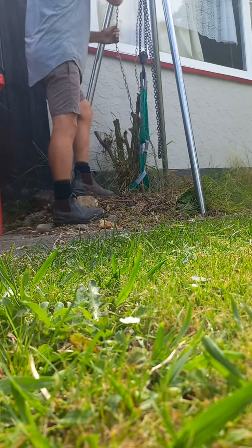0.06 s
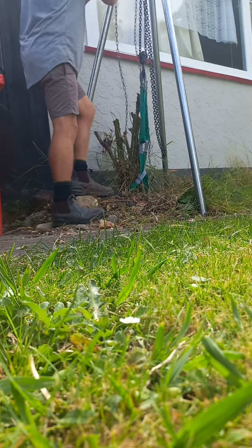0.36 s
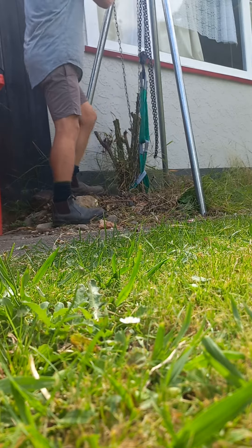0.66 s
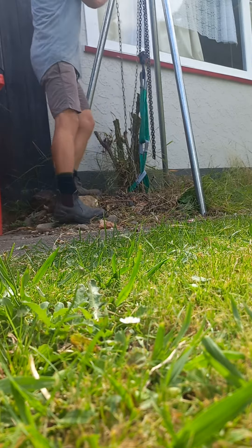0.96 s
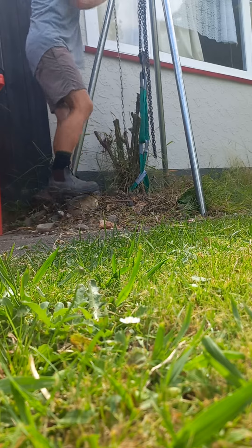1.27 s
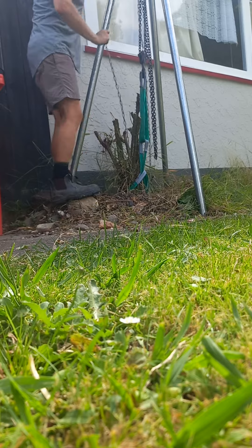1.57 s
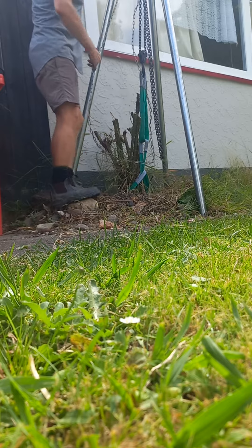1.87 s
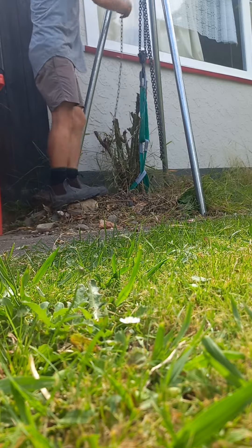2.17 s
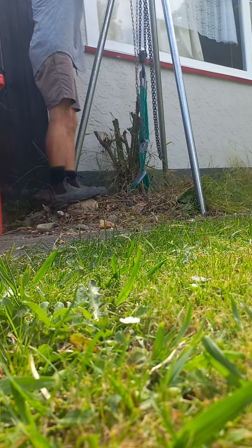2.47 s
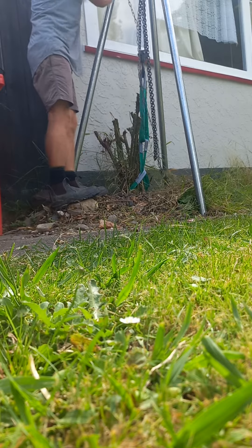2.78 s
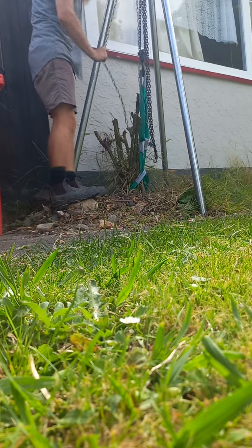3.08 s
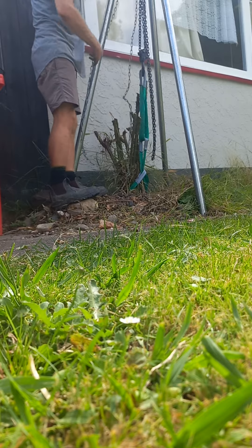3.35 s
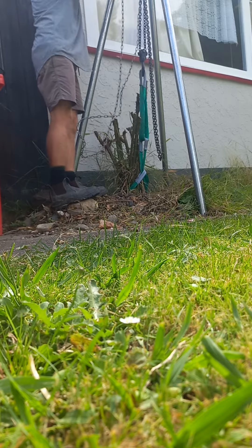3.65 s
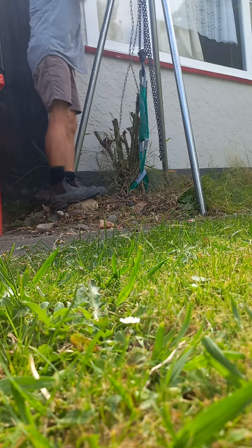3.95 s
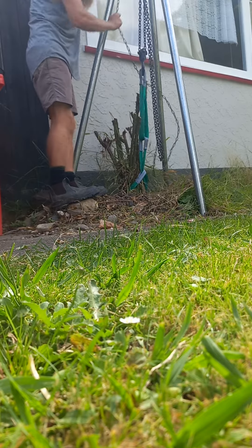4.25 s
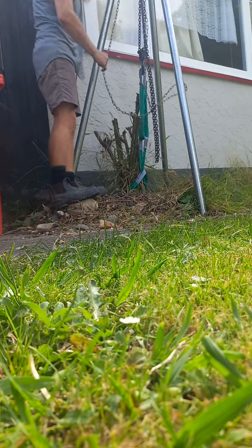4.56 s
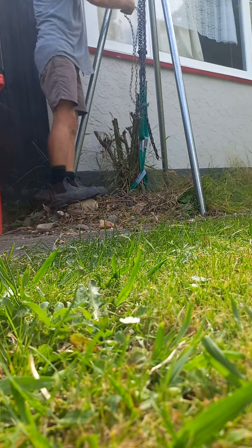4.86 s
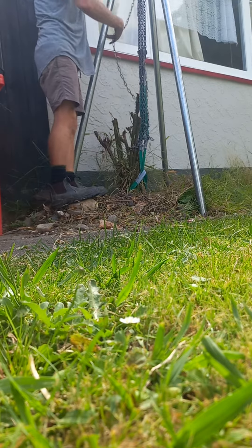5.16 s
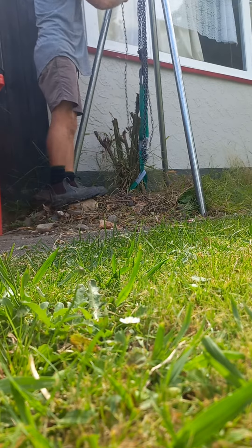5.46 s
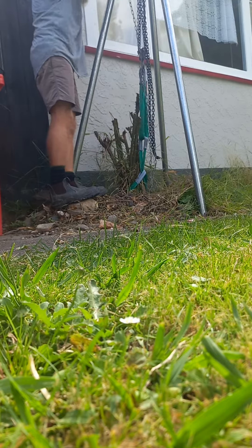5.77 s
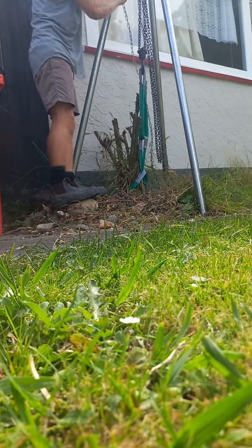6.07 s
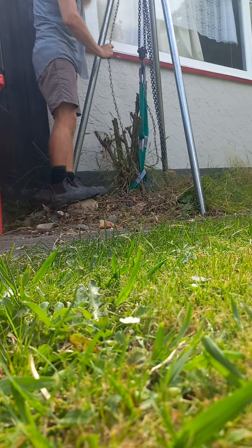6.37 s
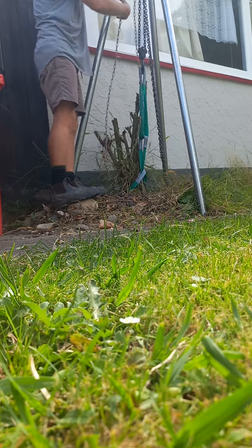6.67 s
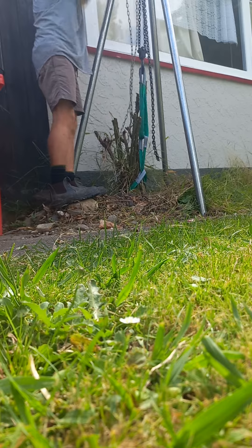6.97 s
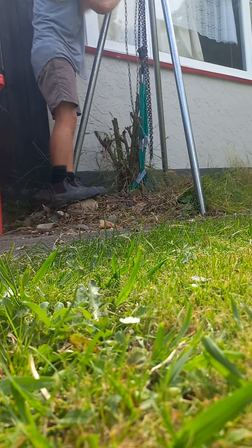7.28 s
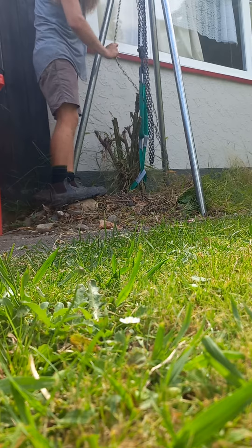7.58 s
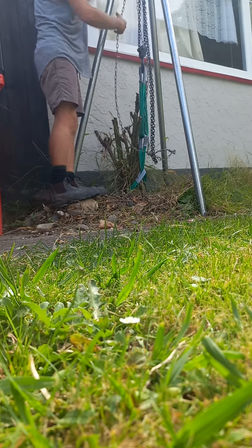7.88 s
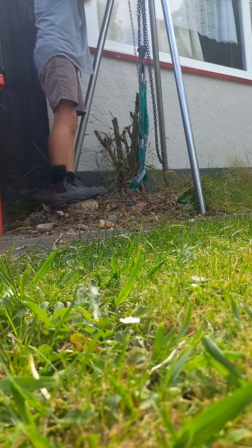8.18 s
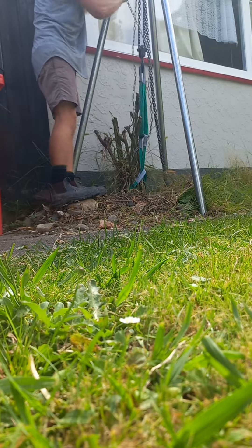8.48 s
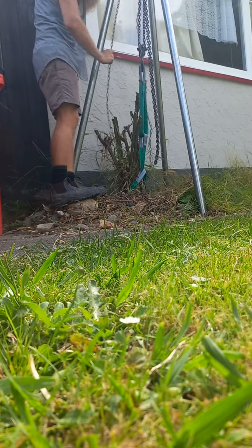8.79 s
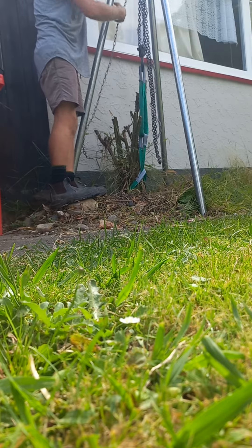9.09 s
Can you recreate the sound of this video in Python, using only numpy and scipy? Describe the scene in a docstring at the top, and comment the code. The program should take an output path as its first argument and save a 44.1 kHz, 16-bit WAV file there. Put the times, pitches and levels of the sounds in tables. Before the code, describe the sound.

A hand chain hoist works outdoors, somewhat to the left, over a low steady murmur and thin hiss. The end of one pull rattles at the very start. Six more follow, each a little over half a second long, at about 1.3, 2.7, 4.0, 5.9, 7.1 and 8.3 seconds. Each begins with a few quick metal clanks, runs into fast ratchet ticking, clattering links and dull gear rumble, then slows and ends with a soft bump. Between pulls the slack chain jingles with a very high shimmer, clanks against the block and knocks the steel tripod into brief ringing, notably around 2.3, 3.5, 5.3 to 5.8, 6.6 to 7.0 and 8.1 seconds. Boots tread softly between 0.6 and 2.6 seconds. A distant engine hums faintly and fades by about 3 seconds. The last pull ends near 9 seconds with a ringing knock and jingle.

```python
"""Chain hoist in a garden

A chain hoist on a steel tripod is hauled hand over hand, close to a house wall. With each pull the
pawl ticks, links clatter over the wheel and the gears rumble; between pulls the slack hand chain
jingles, clanks and knocks the steelwork into ringing. A distant engine hums and fades."""
import sys
import numpy as np
from scipy import signal
from scipy.fft import rfft, irfft, next_fast_len
from scipy.io import wavfile
from scipy.ndimage import uniform_filter1d, minimum_filter1d

SR = 44100
rng = np.random.default_rng(int(sys.argv[2]) if len(sys.argv) > 2 else 0)


def waveform_to_disk(signal):
    """Save audio, clipped to [-1, 1], as 16-bit WAV at the path in sys.argv[1]."""
    frames = np.transpose(np.atleast_2d(signal))
    scaled = np.clip(frames, -1, 1) * 32767
    samples = np.round(scaled).astype(np.int16)
    wavfile.write(sys.argv[1], SR, samples)


N = 403057
TIME = np.arange(N) / SR
TAIL_TIME = TIME[:SR // 3]   # time axis of one hit's tail

# Tone of the street bed. Each row: frequency in Hz, gain in dB.
MURMUR_EQ = [(30, -33), (60, -12), (100, 3.5), (170, -6.5), (280, -7), (480, -14), (650, -11.5),
             (800, -16.5), (1300, -31.5), (2500, -32.5)]
# Fader ride of the street bed. Each row: time in seconds, level in dB.
MURMUR_RIDE = [(0, -40.5), (1.3, -36.5), (2.1, -40), (4.4, -42.5), (5.5, -45.5), (6.1, -41), (8.2, -42.5),
               (9.1, -40.5)]
# Fader ride of the distant engine. Each row: time in seconds, level in dB.
ENGINE_RIDE = [(0, -37), (1.3, -33), (1.8, -43.5), (2.7, -39), (3.3, -52)]
# Pulls on the hand chain. Each row: start, run-up and stop in seconds, relative level and
# shiver of the small links in dB, gap between the first clanks in seconds.
PULLS = [(-.2, .15, 0.17, -23.5, -26.5, .04), (1.287, .11, 1.81, -18.5, -27, 0.059),
         (2.683, 0.097, 3.22, -20.5, -17.5, 0.033), (3.96, .12, 4.512, -22, -23, 0.048),
         (5.8775, .2, 6.44, -21.5, -30, .048), (7.1306, .15, 7.69, -20.5, -26, 0.049),
         (8.3357, 0.2, 8.956, -21, -22, 0.048)]
# Boots treading. Each row: start in seconds, relative level in dB.
FOOTSTEPS = [(.642, -28), (1.0, -30.5), (1.547, -19), (1.978, -29), (2.12, -29), (2.58, -28)]
# Dull body of the gears, bumps and boots. Each row: frequency in Hz, gain in dB.
RUMBLE_EQ = [(150, -28), (230, -20), (310, -4), (500, -2), (570, -3.5), (645, 5), (740, -6), (950, -1.5),
             (1300, -15), (2200, -17)]
# The swinging chain knocks the steelwork. Each row: start in seconds, relative clank and ring in dB.
KNOCKS = [(2.2929, -10, -26), (2.4643, -15.5, -27), (3.1894, -31, -32), (3.2829, -19, -27.5),
          (3.634, -16.5, -33.5), (3.772, -21.5, -31.5), (4.476, -15, -29.5), (5.2964, -13, -28.5),
          (5.4851, -18, -31.5), (5.7662, -15.5, -33.5), (6.9689, -13.5, -34), (8.1317, -12.5, -28.5),
          (8.8334, -18, -20), (8.9311, -23, -21)]
# Ring of the steelwork. Each row: pitch in Hz, relative level in dB, time to fall 60 dB in seconds.
STEEL_MODES = [(3024, -21, 1.3), (3802, -3, .8), (3880, -1, .14), (4750, 5, .05), (10590, -10, .7)]
# Single links ringing freely. Each row: start in seconds, relative level in dB, pitch in Hz.
PINGS = [(.36, -44, 4360), (0.472, -44, 3410), (3.33, -25.5, 5320), (4.862, -14, 12640),
         (5.231, -33, 12620), (5.45, -36, 12620), (6.41, -18, 4250), (8.929, -21.5, 5360)]
# Flicks of the hand chain. Each row: start in seconds, relative level in dB, time for the shiver
# to fall 60 dB in seconds.
FLICKS = [(.6335, -30, 0.72), (.851, -18, 0.56), (1.85, -18.5, 0.64), (2.392, -17, 0.24),
          (2.4418, -15.5, 1), (3.153, -7.5, 0.57), (3.5404, -17, 0.54), (4.491, -14, 0.21),
          (4.67, -14.5, 1), (4.7501, -10, 0.17), (4.866, -11.5, 2.5), (5.33, -10.5, 1.1), (5.664, -19, 1.6),
          (7.098, -20, 0.35), (7.79, -19, 0.83), (7.98, -24, 0.54), (8.13, -15.5, 0.52),
          (8.87, -12.5, 0.88)]
# Bright tick of small links touching. Each row: frequency in Hz, gain in dB.
LINK_EQ = [(2000, -97), (3000, -37), (7500, 3), (9500, 8), (10600, 5), (13800, 7), (15000, 33),
           (15700, -17.5)]
# Ring of the small links. Each row: pitch in Hz, bandwidth in Hz, relative level in dB.
LINK_MODES = [(12620, 45, -19), (15170, 110, -5), (15490, 70, 0), (15620, 90, -3)]
# Slack links clank against the block. Each row: start in seconds, relative level in dB.
CLANKS = [(0.1091, -18), (3.4491, -10.5), (3.695, -16.5), (3.915, -25), (5.5493, -19.5), (6.573, -16),
          (6.791, -15.5), (6.9486, -18), (8.2428, -16.5)]
# Crack of steel on steel. Each row: frequency in Hz, gain in dB.
CLATTER_EQ = [(900, -10.5), (1400, -8), (1800, 3.5), (2100, -12.5), (2500, -1), (4300, 2), (4900, 0),
              (7200, -1.5), (8800, -3.5), (10000, -2.5), (11500, -6), (13500, -3.5), (15500, -14)]
# Ring of the hoist block. Each row: pitch in Hz, bandwidth in Hz, relative level in dB.
BLOCK_MODES = [(3008, 8.1, 2), (3284, 14.4, 1.5), (3833, 50, -2), (4286, 13.6, 5), (5220, 30, -4),
               (6600, 40, -9.5), (7740, 43, -6.5)]
# Ring of the pawl and ratchet wheel. Each row: pitch in Hz, bandwidth in Hz, relative level in dB.
RATCHET_MODES = [(2407, 17, 1.5), (2531, 52, -3.5)]
# Pan of the hoist, which stands to the left. Each row: frequency in Hz, left minus right in dB.
HOIST_PAN = [(200, 1.5), (400, 0), (700, -3.5), (1300, -1), (2400, 1), (3200, 7), (4300, 4), (7000, 5),
             (9500, 13), (14000, 9), (15400, 14)]
# Bass that reaches both sides together. Each row: frequency in Hz, gain in dB.
SHARED_BASS_EQ = [(330, -1), (480, -4), (700, -34)]

EASE_S = .085   # the hand slows down before each stop
TAKE_UP_DB, TAKE_UP_GAP_RATIO = 6.5, .85   # first clanks of a pull: boost; each gap over the one before
STOP_BUMP_DB, STOP_BUMP_DELAY_S = -4.5, .02   # the load bumps just after a pull stops
SWING_PULL_DB, SWING_CLANK_DB = -8.5, -23.5   # sends from pulls and clanks into the jangle
SWING_FALL_DB_PER_S, SWING_REST_DB = 47.5, -50   # it settles to a faint clinking
SHIVER_CLANK_DB, SHIVER_FLICK_DB = -22, -6   # sends from clanks and flicks into the shiver
SHIVER_FALL_DB_PER_S, SHIVER_REST_DB = 82, -50   # it settles to a faint tremble
RIGHT_LAG_S, LOW_CUT_HZ, HIGH_CUT_HZ = .00032, 52, 15850


def from_db(db):
    """Decibels to gain."""
    return 10 ** (np.asarray(db) / 20)


def rms_one(x):
    """Scale to rms 1."""
    return x / np.sqrt(np.mean(x ** 2) + 1e-20)


def unit_energy(x):
    """Scale a response to an average energy of 1 per channel."""
    return rms_one(x) / np.sqrt(x.shape[-1])


def fader(rows):
    """Gain over time from rows of seconds and dB."""
    return from_db(np.interp(TIME, *np.transpose(rows)))


def decay(t60):
    """Envelope that loses 60 dB in t60 seconds."""
    return np.exp(-np.log(1000) * TAIL_TIME / t60)


def settle(gain, db_per_s):
    """Envelope follower with instant attack and a steady release."""
    fall = db_per_s * TIME
    return from_db(np.maximum.accumulate(20 * np.log10(np.abs(gain) + 1e-9) + fall) - fall)


def equalise(x, eq, amount=1):
    """Apply an EQ curve, its dB values scaled by amount."""
    hz, db = np.transpose(eq)
    size = next_fast_len(x.shape[-1])
    log_hz = np.log(np.arange(size // 2 + 1) * SR / size + 1)
    gain = from_db(amount * np.interp(log_hz, np.log(hz), db))
    return irfft(rfft(x, size) * gain, size)[..., :x.shape[-1]]


def noise(eq, mono, size=N):
    """Coloured stereo noise at rms 1; mono is the share of power common to both sides."""
    white = rng.standard_normal((3, size))
    return rms_one(equalise(np.sqrt(mono) * white[2] + np.sqrt(1 - mono) * white[:2], eq))


def drift(per_s):
    """Smooth random wander with a spread of about 1."""
    points = rng.standard_normal(N // 40)
    return np.interp(TIME * per_s, np.arange(len(points)), points)


def level_out(x, window_s):
    """Hold the slow level of a rattle at 1, keeping its grain."""
    power = uniform_filter1d(np.mean(x ** 2, axis=0), int(window_s * SR))
    return x / np.sqrt(uniform_filter1d(power, int(window_s * SR / 2)) + 1e-9)


def touches(per_s, spread_db):
    """Random contacts of uneven strength."""
    return (rng.random(N) < per_s / SR) * from_db(spread_db * np.clip(rng.standard_normal(N), -2, 2))


def hits(cues, bounce_s=0, bounce_db=0, count=1):
    """For each cue of seconds and dB, count clicks: the hit, then its weaker bounces."""
    clicks = np.zeros(N + SR)
    for (start, db), gaps in zip(cues, rng.uniform(.46, 1.5, (len(cues), count))):
        times = start + bounce_s * (np.cumsum(gaps) - gaps[0])
        clicks[(times * SR).astype(int)] += from_db(db + bounce_db * np.arange(count))
    return clicks[:N]


def ring(clicks, hz, t60):
    """Each click sets a decaying sine ringing at its own height."""
    radius, angle = np.exp(-np.log(1000) / (t60 * SR)), 2 * np.pi * hz / SR
    feedback = [1, -2 * radius * np.cos(angle), radius ** 2]
    return signal.lfilter([0, np.sin(angle)], feedback, clicks + 1e-18)


def strike(clicks, eq, modes, ring_db, crack_t60, wall_db, wall_t60, detune=0, points=8):
    """Clicks land on several contact points, each with its own crack, tuning and scatter off the wall."""
    hz, width, db = np.transpose(modes)[..., None]
    landing, out = rng.integers(0, points, N), 0
    for point in range(points):
        pitch = hz * (1 + detune * rng.normal(size=hz.shape))
        partials = from_db(db) * width * np.exp((2j * np.pi * pitch - np.pi * width) * TAIL_TIME)
        strengths = rng.normal(size=(2, len(hz))) + 1j * rng.normal(size=(2, len(hz)))
        ringing = unit_energy((strengths @ partials).real)
        crack = unit_energy(noise(eq, mono=.7, size=len(TAIL_TIME)) * decay(crack_t60))
        scatter = unit_energy(noise(eq, mono=.17, size=len(TAIL_TIME)) * decay(wall_t60))
        response = unit_energy(crack + from_db(wall_db) * scatter + from_db(ring_db) * ringing)
        out = out + signal.oaconvolve((clicks * (landing == point))[None], response, axes=1)[:, :N]
    return out


def street():
    """The bed: low outdoor murmur, thin hiss and a distant engine humming with its third harmonic."""
    murmur = fader(MURMUR_RIDE) * noise(MURMUR_EQ, mono=.97)
    hiss = from_db(-53) * noise([(500, 17), (2000, 12), (15000, -25)], mono=.063)
    engine_hz = 69 * (1 + .0181 * drift(9))
    phase = 2 * np.pi * np.cumsum(engine_hz) / SR
    hum = np.sin(phase) + from_db(-10) * np.sin(3 * phase)
    engine = fader(ENGINE_RIDE) * from_db(2.2 * drift(9)) * hum
    return (murmur + engine) * from_db([[1.1], [-1.1]]) + hiss


def hauling():
    """Envelopes for chain speed (0-1), effort and link shiver: each pull runs up, holds and eases off."""
    strokes = np.array([np.clip(np.minimum((TIME - start) / run_up, (stop - TIME) / EASE_S), 0, 1)
                        for start, run_up, stop, *_ in PULLS])
    *_, level_db, shiver_db, _ = np.transpose(PULLS)
    return strokes.sum(axis=0), from_db(level_db) @ strokes, from_db(shiver_db) @ strokes


def clank_cues():
    """Cues in seconds and dB: four quickening clanks as a pull takes up slack, plus strays and knocks."""
    beats = np.append(0, np.cumsum(TAKE_UP_GAP_RATIO ** np.arange(3)))
    take_up = [(start + gap * beat, db + TAKE_UP_DB)
               for start, _, _, db, _, gap in PULLS if start > 0 for beat in beats]
    return take_up + CLANKS + [(start, db) for start, db, _ in KNOCKS]


def gears_and_thumps(speed, effort):
    """The low end: loaded gears knock dully in mid-pull, the load bumps at the stops and boots tread."""
    spin = uniform_filter1d(speed, int(.26 * SR))
    grain = signal.oaconvolve(touches(300, spread_db=2.5) ** 2, decay(.034))[:N]
    gear_power = (from_db(-8.5) * effort * spin) ** 2 * grain / grain.mean()
    stops = [(stop + STOP_BUMP_DELAY_S, db + STOP_BUMP_DB)
             for start, _, stop, db, *_ in PULLS if start > 0]
    thumps = hits(stops + FOOTSTEPS, bounce_s=.007, bounce_db=-15, count=3)
    thump_power = from_db(-6) * signal.oaconvolve(thumps ** 2, decay(.11))[:N]
    return np.sqrt(np.abs(gear_power + thump_power)) * noise(RUMBLE_EQ, mono=1)


def swinging_chain(effort):
    """Pulls and clanks swing the slack chain; its links jangle softly at scattered pitches and settle."""
    stirred = from_db(SWING_PULL_DB) * effort + from_db(SWING_CLANK_DB) * hits(clank_cues())
    swing = np.hypot(settle(stirred, SWING_FALL_DB_PER_S), from_db(SWING_REST_DB))
    clinks = strike(touches(90, spread_db=4), CLATTER_EQ, BLOCK_MODES + RATCHET_MODES, ring_db=7,
                    crack_t60=.04, wall_db=-6, wall_t60=.18, detune=.07, points=12)
    return swing * level_out(clinks, window_s=.14)


def steelwork():
    """Knocked steel rings on and single links ping, roughened by the chain brushing the steel."""
    knocks = hits([(start, db) for start, _, db in KNOCKS])
    ringing = sum(ring(knocks * from_db(db), hz, t60) for hz, db, t60 in STEEL_MODES)
    pings = sum(ring(from_db(db) * (np.arange(N) == int(start * SR)), hz, t60=.13)
                for start, db, hz in PINGS)
    brushing = from_db(4 * np.array([drift(130), drift(130)]))
    return from_db(2.5) * (ringing + pings) * brushing


def hand_chain(pull_shiver):
    """The sparkle: small links touch and ring very high, shivering after pulls, clanks and flicks."""
    contacts = strike(touches(600, spread_db=2.5), LINK_EQ, LINK_MODES, ring_db=15,
                      crack_t60=.035, wall_db=0, wall_t60=.15, detune=.0015)
    lurch = from_db(2.5 * drift(28))
    after_flicks = sum((TIME > start) * from_db(db + SHIVER_FLICK_DB - 60 * np.abs(TIME - start) / t60)
                       for start, db, t60 in FLICKS)
    jolts = np.zeros(N)
    for start, db in clank_cues():
        jolts[int(start * SR)] = from_db(db + SHIVER_CLANK_DB)
    stirred = settle(np.maximum(pull_shiver, jolts), SHIVER_FALL_DB_PER_S)
    shaking = np.maximum(stirred, after_flicks) + from_db(SHIVER_REST_DB)
    shiver = shaking * lurch * level_out(contacts, window_s=.066)
    clicks = hits([(start, db) for start, db, _ in FLICKS], bounce_s=.0036, bounce_db=-4.5, count=5)
    flicks = strike(clicks, LINK_EQ, LINK_MODES[1:], ring_db=7,
                    crack_t60=.034, wall_db=-1, wall_t60=.16, points=4)
    return from_db(-2) * shiver + from_db(15.5) * flicks


def clanks():
    """The accents: heavy links hit the block and bounce."""
    clicks = from_db(15.5) * hits(clank_cues(), bounce_s=.005, bounce_db=-4, count=3)
    return strike(clicks, CLATTER_EQ, BLOCK_MODES, ring_db=-5, crack_t60=.05, wall_db=-11, wall_t60=.2)


def pawl_and_wheel(speed, effort):
    """The lead: the pawl ticks faster the quicker the pull, while links drop into the wheel at random."""
    pace = np.sqrt(speed) + .1
    teeth_passed = np.cumsum(72 * pace * from_db(3.5 * drift(70))) / SR
    ticks = np.diff(np.floor(teeth_passed), prepend=0) * from_db(2.5 * drift(85))
    drops = from_db(-4.5) * touches(420 * pace, spread_db=3)
    clatter = strike(ticks + drops, CLATTER_EQ, BLOCK_MODES, ring_db=-2.5,
                     crack_t60=.046, wall_db=-5.5, wall_t60=.062, detune=.0076, points=10)
    pawl = strike(ticks, CLATTER_EQ, RATCHET_MODES, ring_db=26,
                  crack_t60=.028, wall_db=-7, wall_t60=.15, detune=.012, points=4)
    return effort * (from_db(-1) * level_out(clatter, window_s=.097)
                     + from_db(-6) * level_out(pawl, window_s=.26))


def scene():
    """The mix over the street bed: above the bass the hoist arrives left first, its treble far left."""
    speed, effort, pull_shiver = hauling()
    hoist = (pawl_and_wheel(speed, effort) + gears_and_thumps(speed, effort) + swinging_chain(effort)
             + clanks() + hand_chain(pull_shiver) + steelwork())
    left, right = equalise(hoist, HOIST_PAN, amount=np.array([[.5], [-.5]]))
    late = np.interp(TIME - RIGHT_LAG_S, TIME, right)
    right = late + equalise(right - late, SHARED_BASS_EQ)
    return np.array([left, right]) + street()


def record(dry):
    """The master chain: a low cut, a limiter that ducks the highest peaks, and a steep high cut."""
    thinned = signal.sosfilt(signal.butter(4, LOW_CUT_HZ, "high", fs=SR, output="sos"), dry)
    ducking = np.minimum(1, .85 / (np.abs(thinned).max(axis=0) + 1e-9))
    limited = thinned * uniform_filter1d(minimum_filter1d(ducking, size=200), size=200)
    return signal.sosfilt(signal.ellip(12, .2, 80, HIGH_CUT_HZ, fs=SR, output="sos"), limited)


dry = scene()
out = record(dry)
waveform_to_disk(out)
```